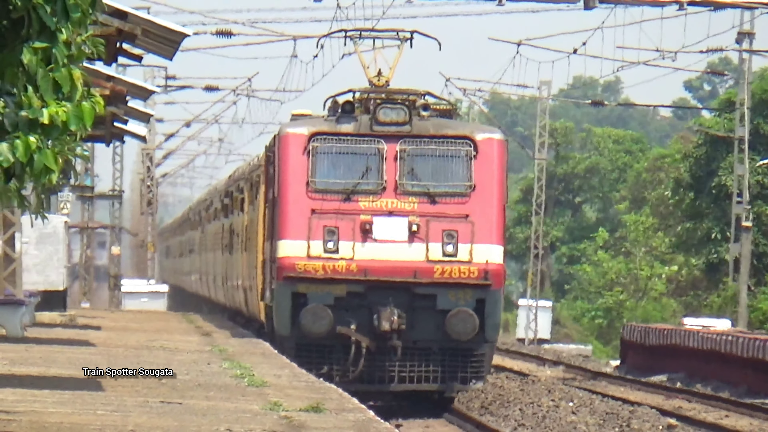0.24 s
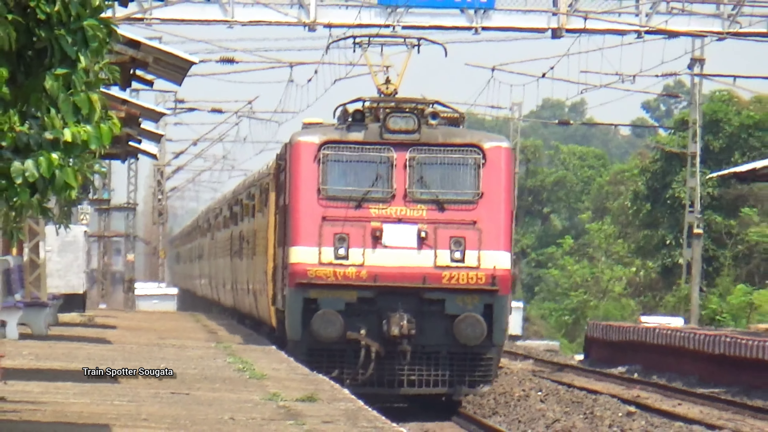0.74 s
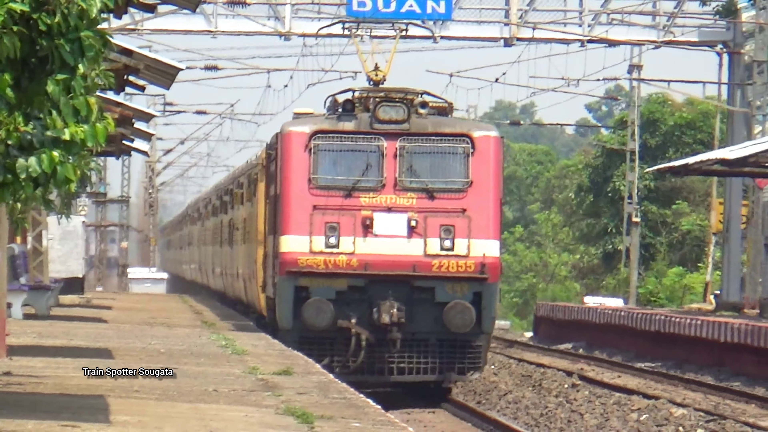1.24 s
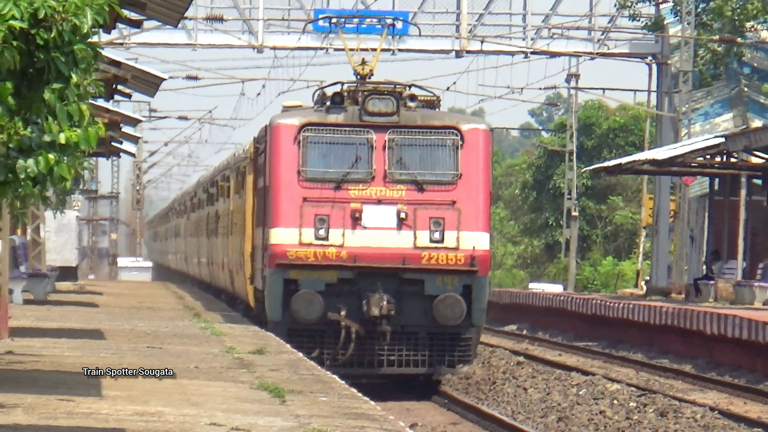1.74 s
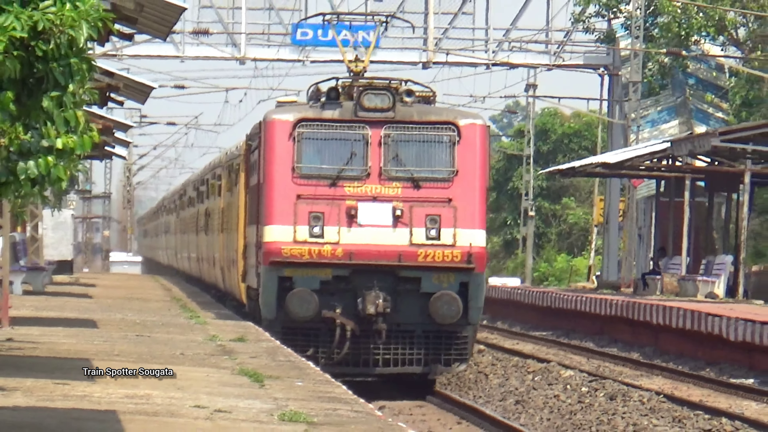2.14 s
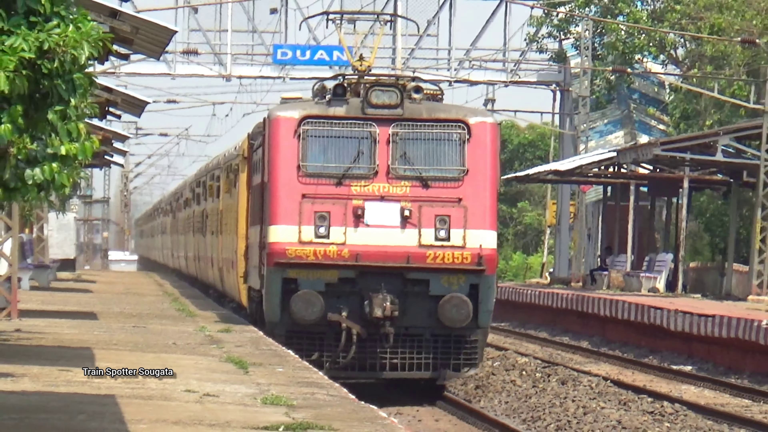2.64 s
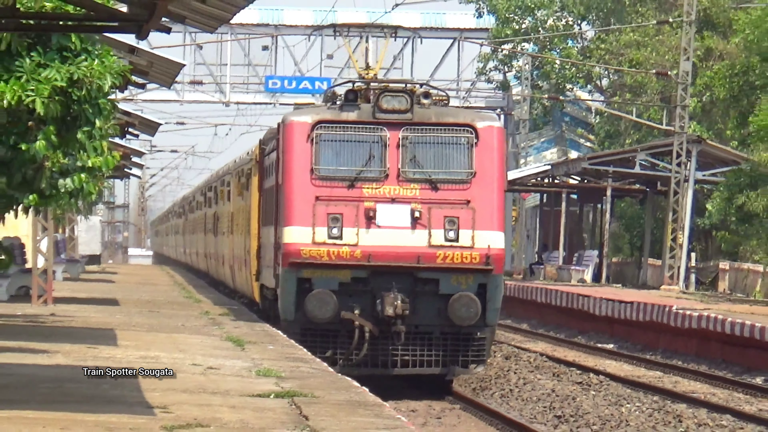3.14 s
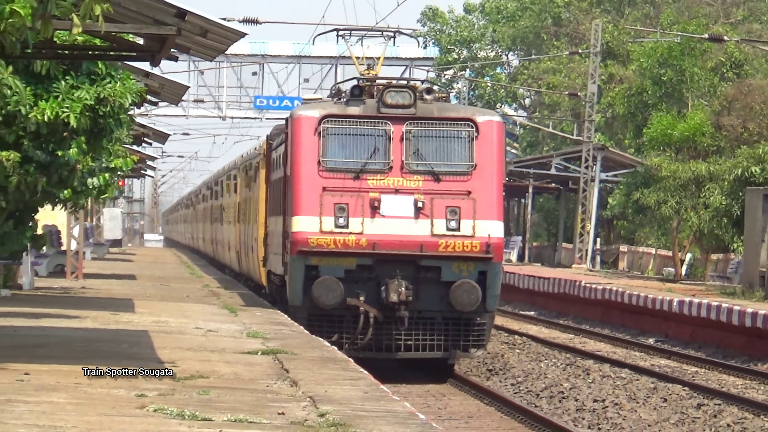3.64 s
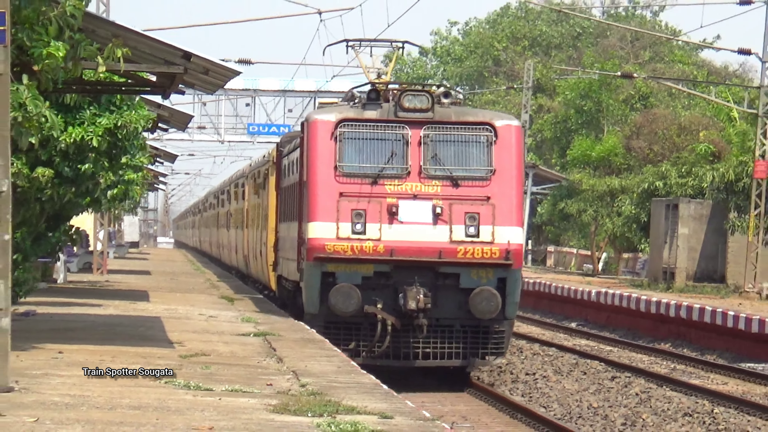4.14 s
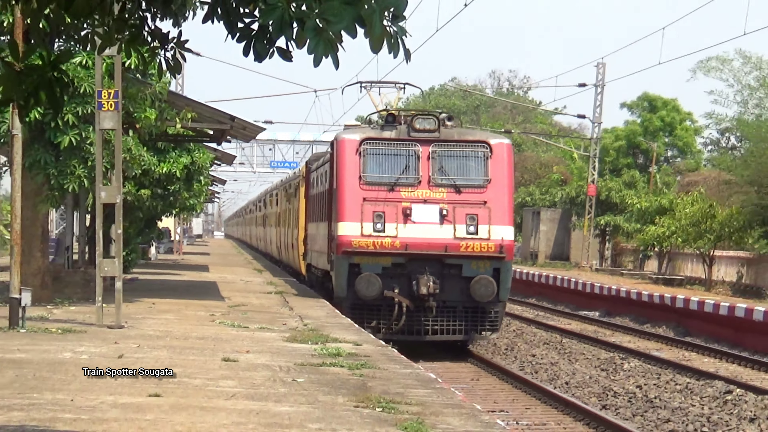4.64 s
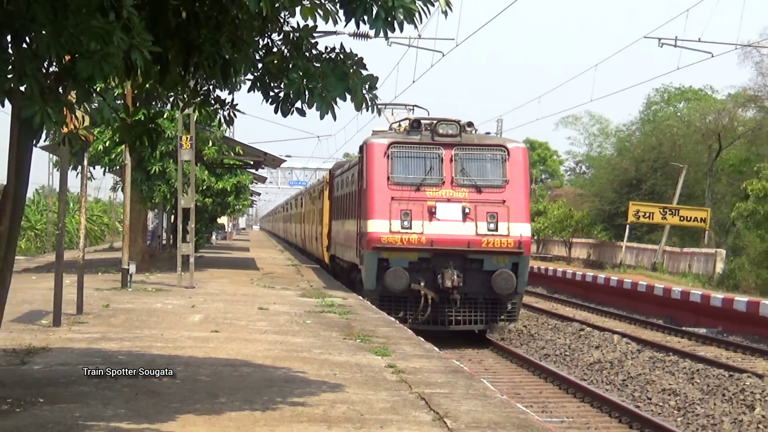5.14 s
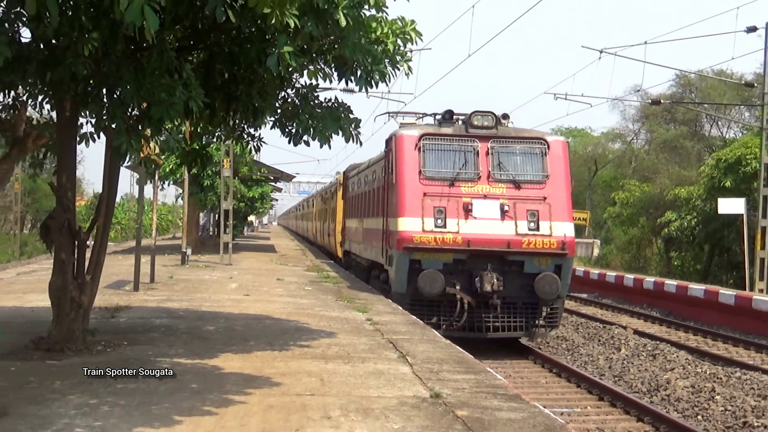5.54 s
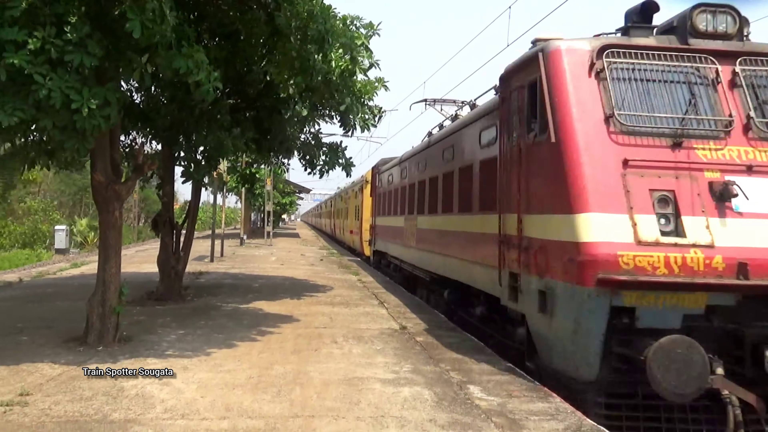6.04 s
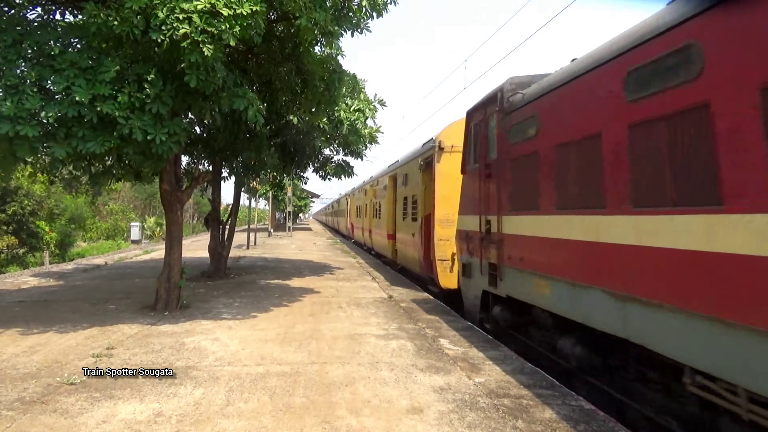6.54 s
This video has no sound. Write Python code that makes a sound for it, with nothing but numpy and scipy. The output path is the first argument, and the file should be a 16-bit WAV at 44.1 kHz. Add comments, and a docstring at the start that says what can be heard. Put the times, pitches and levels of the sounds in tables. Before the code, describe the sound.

A fast electric train approaches and passes a close stereo microphone on an open platform. At first there are soft wind thumps and quiet, wavering rail singing, then increasing rolling noise and steely hiss. One sustained brassy horn blast dominates, rough and bright, with short trackside reflections and a faint station echo. After it cuts off, broad rushing wheel noise fills the foreground, with metallic ringing surges and irregular knocks.

```python
"""An electric express train runs through a station, heard from the edge of the platform.
First come wind-shaken noise bursts and the singing rails: noise through narrow resonances, over growing wheel roll.
A valve squeaks and the air horn blasts once: summed partials, combed by a sweeping ground echo, over a noise floor,
with trackside and station echoes; a limiter ducks all else with it. Then the wheels roar past, as coloured noise."""
import sys
import numpy as np
from scipy import signal
from scipy.fft import rfft, irfft
from scipy.io import wavfile
from scipy.ndimage import uniform_filter1d, minimum_filter1d

SR = 44100
rng = np.random.default_rng(int(sys.argv[2]) if len(sys.argv) > 2 else 0)


def file_out(sig):
    """Save sig as 16-bit WAV at sys.argv[1]."""
    # one column per channel
    cols = np.atleast_2d(sig).T
    # limit, then scale
    lim = np.clip(cols, -1, 1)
    pcm = np.round(lim * 32767).astype(np.int16)
    wavfile.write(sys.argv[1], SR, pcm)


N = 299439
T, HZ = np.arange(N) / SR, np.fft.rfftfreq(N, 1 / SR)

# the train: its speed, when its front draws level, and how far to the side its horn passes
SPEED_M_PER_S, LEVEL_AT_S, OFFSET_M = 30, 6.08, 8.48
# when the air is on, and the fades of the blast
HORN_ON_S, HORN_OFF_S = 4.25, 5.85
HORN_ATTACK_S, HORN_RELEASE_S = 0.048, 0.088
# colour of the horn's flare: (frequency [Hz], level [dB])
FLARE = [(317, -9.7), (633, -8.3), (950, 3.1), (1270, -4.3), (1600, -4), (2300, -4.3), (3300, -9.5),
         (3800, -12), (4800, -19), (6000, -22), (7200, -14.7), (8000, -15), (9300, -7.8), (11000, -18.3),
         (13000, -29), (15500, -37)]


def amp(db):
    """Decibels to gain."""
    return 10 ** (np.asarray(db) / 20)


def evened(x):
    """Scales to rms 1."""
    return x / np.sqrt(np.mean(x ** 2) + 1e-20)


def read(points, hz=HZ):
    """A curve joined by straight lines over log frequency."""
    f, value = np.transpose(points)
    return np.interp(np.log(hz + 1), np.log(f + 1), value)


def peaks(modes):
    """Gain over frequency of steep resonances, their powers added."""
    power = 0
    for hz, width, db in modes:
        detuning = (HZ - hz) / (0.58 * width)
        power = power + amp(db) ** 2 / (1 + detuning ** 2) ** 2
    return np.sqrt(power)


def swells(rows):
    """An envelope of short bell-shaped swells."""
    return sum(amp(db) * np.exp(-2 * ((T - s) / length) ** 2) for s, length, db in rows)


def ramp(t, start, length):
    """A smooth step from 0 to 1."""
    return np.sin(np.pi / 2 * np.clip((t - start) / length, 0, 1)) ** 2


def wobble(rate_hz, size=4096):
    """A random wander of about rms 1, smoothed above the given rate."""
    slow_hz = np.fft.rfftfreq(size, T[-1] / size)
    slow = irfft(rfft(rng.standard_normal(size)) / (1 + (slow_hz / rate_hz) ** 4))
    return np.interp(T, np.linspace(0, T[-1], size), evened(slow))


def tones(rows, waver=0.0025, rate_hz=14):
    """Pure notes that each waver in pitch by their own random fraction."""
    total = 0
    for hz, db in rows:
        turns = np.cumsum(hz * (1 + waver * wobble(rate_hz))) / SR
        total = total + amp(db) * np.sqrt(2) * np.sin(2 * np.pi * turns)
    return total


def noise(gain, same, balance_db=0, phase=0):
    """Coloured noise of rms 1 at the two microphones; same is their likeness."""
    shared, own = rfft(rng.standard_normal((2, N)))
    other = same * shared + np.sqrt(1 - same ** 2) * own
    lean = amp(balance_db / 2) * np.exp(0.5j * phase)
    return evened(irfft(gain * np.array([shared * lean, other / lean]), N))


def down_the_line(gain, same):
    """Noise arriving from far along the track, with its own balance and phase between the microphones."""
    # left against right: (frequency [Hz], left-right level [dB])
    far_balance = [(250, -1), (400, 0), (520, -4), (750, -0.5), (950, -7), (1080, 2.5), (1140, -12),
                   (1200, -11), (1320, 3), (1700, 0.5), (2300, 0.5), (15000, 0)]
    # lead of the left microphone: (frequency [Hz], phase [rad])
    far_phase = [(40, -0.33), (130, 0.72), (300, -0.44), (650, 0.73), (800, 1.02), (1000, 1.04),
                 (1160, 0.1), (1240, 1.1), (1400, 0.63), (2200, 0.43), (15000, 0.15)]
    return noise(gain, same, read(far_balance), read(far_phase))


def ahead(t=T):
    """Metres that the train has still to run before it draws level."""
    return SPEED_M_PER_S * np.maximum(LEVEL_AT_S - t, 0)


def distance(t=T):
    """Metres from microphone to horn, held at the closest once the front is level."""
    return np.hypot(ahead(t), OFFSET_M)


def wind():
    """Low-pitched gusts on the microphone, over a rumble that grows as the train nears."""
    # gusts: (time [s], half-length [s], level [dB])
    gusts = [(.06, .092, -48), (.25, .11, -52), (.5, .17, -56), (.73, .072, -51), (.81, .04, -46),
             (1.34, .06, -51), (1.43, 0.045, -43), (4.26, 0.051, -43)]
    # wind spectrum: (frequency [Hz], density [dB per Hz])
    wind_colour = [(20, -16), (60, -5.5), (110, 2), (190, 3.5), (320, -3), (600, -32), (3000, -73)]
    rumble_db, loss_db_per_m = -52.3, 0.016
    rumble = amp(rumble_db - loss_db_per_m * ahead())
    return (swells(gusts) + rumble) * noise(amp(read(wind_colour)), same=0.86)


def rails(tones_balance_db=-5):
    """Rough wheels drive the rails' bending modes, which carry far ahead of the train."""
    # bending resonances: (frequency [Hz], nominal width [Hz], level [dB])
    rail_modes = [(491.7, 5.9, -20), (924, 155, -21), (1046.6, 22, -8.5), (1085.3, 18, -7), (1101, 5.2, -1),
                  (1150, 71, -7), (1171, 31, -4), (1277, 22, -14), (1324, 19.5, -14)]
    # steady notes within the ringing: (frequency [Hz], level [dB])
    rail_tones = [(522, -30), (1080, -9), (1132, -10)]
    # surges of the ringing: (time [s], half-length [s], level [dB])
    surges = [(6.19, 0.059, -15), (6.345, .03, -3)]
    # full strength within reach, then a loss for each metre beyond
    singing_db, reach_m, loss_db_per_m = -13, 89.3, 0.1163
    level_db = singing_db - loss_db_per_m * np.maximum(ahead() - reach_m, 0)
    flutter = amp(-2.7 + 2.0 * wobble(48))
    ringing = flutter * down_the_line(peaks(rail_modes), same=0.97)
    steady = tones(rail_tones) * amp(np.array([[1], [-1]]) * tones_balance_db / 2)
    return (amp(level_db) + swells(surges)) * (ringing + steady)


def approach():
    """The roll of the wheels through the air and their sizzle through the steel."""
    # distant wheels: (frequency [Hz], density [dB per Hz])
    roll_colour = [(25, -34), (60, -33), (130, -39), (190, -13.5), (260, -15.5), (340, -8), (430, -3),
                   (560, -2), (700, 2.5), (900, 9.5), (1250, -2), (1420, -6), (2100, -8.5), (2500, -13.5),
                   (3300, -12.5), (4100, -28.5), (5500, -31), (15000, -60)]
    # sizzle along the rails: (frequency [Hz], density [dB per Hz])
    hiss_colour = [(1000, -25), (4100, 3), (4500, -4), (6200, -8.5), (8300, -6), (9200, 1), (10000, 0),
                   (11200, -1.5), (13200, -10.5), (15500, -23)]
    # bands of sizzle that travel best: (frequency [Hz], nominal width [Hz], level [dB])
    hiss_modes = [(3900, 110, 2), (6980, 240, 2.5), (7300, 290, -2), (9460, 230, 6)]
    # brief spits of sizzle: (time [s], half-length [s], level [dB])
    spit_times = [(1.43, .04, -52), (2.22, .05, -48), (3.08, .07, -44), (3.26, .05, -48), (3.96, 0.06, -40),
                  (4.228, .05, -37)]
    # level with the front alongside, before screening, less a loss for each metre still to run
    roll_db = -10 - 0.1655 * ahead()
    hiss_db = -31.2 - 0.107 * ahead()
    roll = amp(roll_db + 0.2 * wobble(21)) * down_the_line(amp(read(roll_colour)), same=0.94)
    hiss_gain = np.hypot(amp(read(hiss_colour)), peaks(hiss_modes))
    hiss = amp(hiss_db + 0.2 * wobble(30)) * down_the_line(hiss_gain, same=0.88)
    spits = swells(spit_times) * noise(peaks([(10400, 4200, -2), (13300, 900, -2)]), same=1.0)
    return roll + hiss + spits


def screened(track, from_m=66, most_db=18.5):
    """The train's body screens the track behind it, more and more over the last metres."""
    return track * amp(-most_db * np.maximum(1 - ahead() / from_m, 0))


def station(x):
    """Sparse reflections off platform, roofs and trees, each band dying at its own speed."""
    # decay of the echo: (frequency [Hz], time to fall 60 dB [s])
    station_decay = [(300, 1), (1000, 0.7), (3000, 0.36), (10000, 0.048)]
    sparse = rng.standard_normal((2, SR)) * (rng.random((2, SR)) < 2000 / SR)
    taps = sparse * (T[:SR] > 0.004)  # nothing in the first 4 ms
    hz, t, z = signal.stft(taps, SR, nperseg=256)
    decay = amp(-60 * t / read(station_decay, hz)[:, None])
    tail = signal.istft(z * decay, SR, nperseg=256)[1]
    tail = tail + 0.17 * tail[::-1]  # some of each side in the other
    return signal.fftconvolve(x[None], tail / np.linalg.norm(tail[0]), axes=1)[:, :N]


def trackside(x, count=28, longest_s=0.03, drift=0.02, spread_s=0.00014, dull_hz=7000):
    """Echoes off masts, trees and platform slip behind the moving horn: each a little flat, beating with it."""
    on = (T > HORN_ON_S - 0.02) & (T < HORN_OFF_S + 0.3)
    t, out = T[on], np.zeros((2, N))
    dulled = irfft(rfft(x) / np.hypot(1, HZ / dull_hz), N)[on]
    for delay, slip, side, sign in rng.random((count, 4)):
        # the lag starts below longest_s and grows steadily, which flattens the pitch
        lag = longest_s * delay + drift * slip ** 2 * (t - t[0])
        for channel, way in enumerate([-1, 1]):
            heard = np.interp(t - lag + way * spread_s * (side - 0.5), t, dulled, left=0)
            out[channel, on] += np.sign(sign - 0.5) * heard
    return out / np.sqrt(count)


def passing(knock_t60=0.21):
    """Wheels and rushing air alongside, with a few decaying knocks of the running gear."""
    # spectrum alongside: (frequency [Hz], density [dB per Hz])
    roar_colour = [(24, -45), (60, -31), (126, -20), (235, -8.5), (407, -4), (850, -1), (1080, 5.5),
                   (1300, -1), (1770, -6), (2060, -5.5), (2700, -7.5), (3200, -8), (5720, -20),
                   (9410, -22.5), (15500, -59)]
    # knocks beside the platform: (time [s], level [dB])
    knock_times = [(6.315, -25), (6.384, -23), (6.47, -22), (6.635, -29), (6.71, -28)]
    # left against right alongside: (frequency [Hz], left-right level [dB])
    near_balance = [(200, 0.5), (700, -5.5), (2400, -6), (4400, -4.5), (8000, -3.5), (15000, 3)]
    # the wheels run behind the front, and this close to the microphone
    behind_m, wheels_offset_m = 9.2, 2.56
    roar_db, loss_db_per_doubling = -20.5, 4.5
    away = np.hypot(ahead(T - behind_m / SPEED_M_PER_S), wheels_offset_m)
    level_db = roar_db - loss_db_per_doubling * np.log2(away / wheels_offset_m)
    knocks = sum(amp(db - 60 * np.maximum(T - s, 0) / knock_t60) * (T > s) for s, db in knock_times)
    strength = np.hypot(amp(level_db + 1.1 * wobble(65)), knocks)
    return strength * noise(amp(read(roar_colour)), 0.71, read(near_balance))


def blowing(t=T, closest_db=11):
    """Strength of the horn at the microphone: attack, hold and release, louder as it nears."""
    gate = ramp(t, HORN_ON_S, HORN_ATTACK_S) * (1 - ramp(t, HORN_OFF_S, HORN_RELEASE_S))
    return amp(closest_db) * gate * OFFSET_M / distance(t)


def noise_floor(floor_db=-23.5):
    """A broadband noise floor that rises and falls with the blast."""
    # floor spectrum: (frequency [Hz], density [dB per Hz])
    floor_colour = [(25, -22), (70, -10), (170, -4.5), (300, -5), (500, -2), (1100, -2), (3000, -8),
                    (6000, -13.5), (15000, -45)]
    return amp(floor_db) * blowing() * noise(amp(read(floor_colour)), same=0.72)


def valve():
    """The air valve squeaks open on a few quickly wavering notes."""
    # squeak: (time [s], half-length [s], level [dB])
    squeak = [(4.224, .024, -14)]
    # notes of the squeak: (frequency [Hz], level [dB])
    squeak_notes = [(1600, -10), (3000, -8.5), (3230, -2), (3560, -16), (8500, -15.5), (8850, -15)]
    return swells(squeak) * tones(squeak_notes, waver=0.008, rate_hz=80)


def free_swing():
    """The diaphragm swings freely on its own note as the air arrives and after it is shut off."""
    # swings: (time [s], half-length [s], level [dB])
    swing_times = [(4.25, 0.039, -19), (6.02, 0.15, -33)]
    # the diaphragm's note: (frequency [Hz], level [dB])
    swing_note = [(320, 0)]
    return swells(swing_times) * tones(swing_note)


def shimmer(hz, t, depth=0.74, size=70):
    """Unsteady air shifts each partial's strength and phase on its own, the high ones most."""
    knots = rng.standard_normal((len(hz), size, 2)) @ [1, 1j]
    knot_times = np.linspace(t[0], t[-1], size)
    drift = np.array([np.interp(t, knot_times, row) for row in knots])
    return 1 + depth * hz ** 2 / (hz ** 2 + 5000 ** 2) * drift


def air_jet(turns, on, leak=0.16, puff=0.26):
    """Air hisses through the gap in one puff a cycle, coloured by the flare."""
    colour = amp(read(FLARE)) / (1 + (5000 / (HZ + 1)) ** 6)
    hiss = irfft(rfft(rng.standard_normal(N)) * colour, N)[on]
    return evened(hiss * (leak + np.exp(-(turns % 1) / puff)))


def ground_comb(hz, t, echo=0.7, sound_m_per_s=343):
    """The ground echo combs the partials, its notches sweeping lower as the train nears."""
    horn_height_m, mic_height_m = 3.008, 0.862  # above the platform
    # soft ground turns the echo slightly forward; it builds up early in the blast
    lead_s, from_s, build_s = 0.00011, 4.3, 0.15
    lag = 2 * horn_height_m * mic_height_m / distance(t) / sound_m_per_s - lead_s
    # rough ground scatters the treble and mirrors the rest
    mirrored = echo * ramp(t, from_s, build_s) / (1 + (hz / 7000) ** 2)
    return 1 + mirrored * np.exp(-2j * np.pi * hz * lag)


def horn(jitter_s=5e-6, flutter_db=1.3, sweep_s=0.0006, jet_db=-17.5):
    """A diaphragm chops air into sharp pulses, built here from 49 harmonics and a pulsed hiss."""
    # it runs sharp while the pressure is low
    horn_hz, sharp_hz, rise_s, fall_s = 316.4, 14, 0.08, 0.13
    # the flare beams its treble ahead: loss when heard side-on, half of it (in dB) at beam_hz
    beam_loss_db, beam_hz = 12.5, 4150
    # the buzzing top partials need full pressure: they come late
    buzz_delay_s, buzz_attack_s, buzz_release_s, buzz_floor_db = 0.052, 0.078, 0.096, -21

    on = (T > HORN_ON_S) & (T < HORN_OFF_S + HORN_RELEASE_S)
    t = T[on]
    filling = 1 - np.exp(-(t - HORN_ON_S) / rise_s)
    pressure = filling * np.exp(-np.maximum(t - HORN_OFF_S, 0) / fall_s)
    pitch = horn_hz + sharp_hz * (1 - pressure)
    turns = np.cumsum(pitch) / SR + pitch * jitter_s * wobble(100)[on]

    order = np.arange(1, 50)[:, None]
    hz = order * horn_hz
    # in each pulse the steep front comes first and the low partials trail
    trail = np.cumsum(sweep_s * horn_hz / (1 + hz / 2500), axis=0)
    # turbulent air makes the treble flutter, and it fades as the flare turns side-on
    treble_db = flutter_db * wobble(140)[on] - beam_loss_db * (OFFSET_M / distance(t)) ** 2
    treble = amp(treble_db * hz ** 2 / (hz ** 2 + beam_hz ** 2))
    bell = amp(read(FLARE, hz))
    partials = bell / np.linalg.norm(bell) * treble * ground_comb(hz, t) * shimmer(hz, t)
    waves = (partials * np.exp(2j * np.pi * (order * turns - trail))).real

    top = hz[:, 0] > 3950
    jet = amp(jet_db) * treble[-1] * air_jet(turns - trail[-1], on)
    buzz = ramp(t, HORN_ON_S + buzz_delay_s, buzz_attack_s) * (1 - ramp(t, HORN_OFF_S, buzz_release_s))
    buzzing = np.maximum(buzz, amp(buzz_floor_db)) * (waves[top].sum(0) + jet)
    out = np.zeros(N)
    out[on] = blowing(t) * (waves[~top].sum(0) + buzzing)
    return out


def scene(near_echo_db=-9.5, far_echo_db=-35):
    """Wind, track, passing train, and the horn with its echoes."""
    blast = horn() + free_swing()
    # the distance loss is undone: the station's echo does not grow as the horn nears
    far_echo = amp(far_echo_db) * station(blast * distance() / OFFSET_M)
    near_echo = amp(near_echo_db) * trackside(blast)
    track = screened(rails() + approach())
    return wind() + track + passing() + far_echo + near_echo + noise_floor() + valve() + blast


def record(dry, ceiling_db=-5.5, ratio=25, recovery_db_per_s=300, edge_hz=15700):
    """A peak limiter holds the horn down and ducks all else with it; then a low-pass."""
    peak_db = 20 * np.log10(-minimum_filter1d(-abs(dry).max(0), size=400) + 1e-9)
    # the held peak may fall only at the recovery rate
    fall = T * recovery_db_per_s
    held_db = np.maximum.accumulate(peak_db + fall) - fall
    over_db = np.maximum(held_db - ceiling_db, 0)
    limited = dry * amp(-(1 - 1 / ratio) * uniform_filter1d(over_db, size=400))
    low_pass = signal.firwin(1023, edge_hz, window=("kaiser", 9), fs=SR)
    return signal.oaconvolve(limited, low_pass[None], "same")


dry = scene()
out = record(dry)
file_out(out)
```